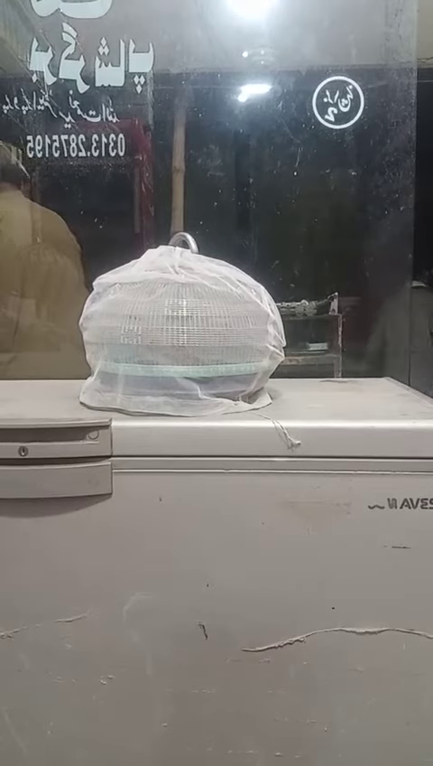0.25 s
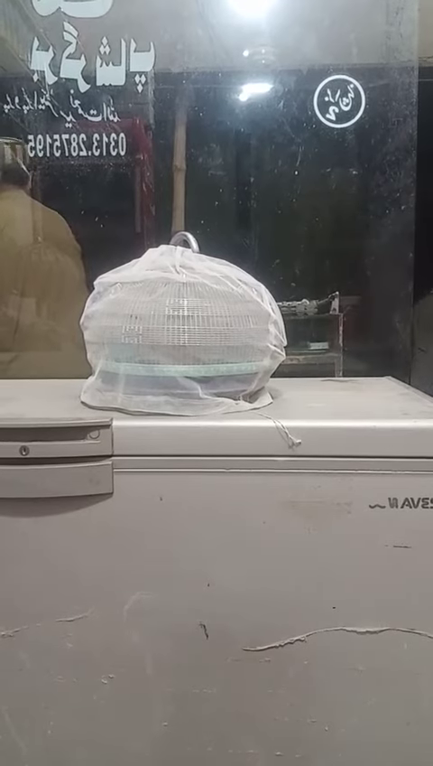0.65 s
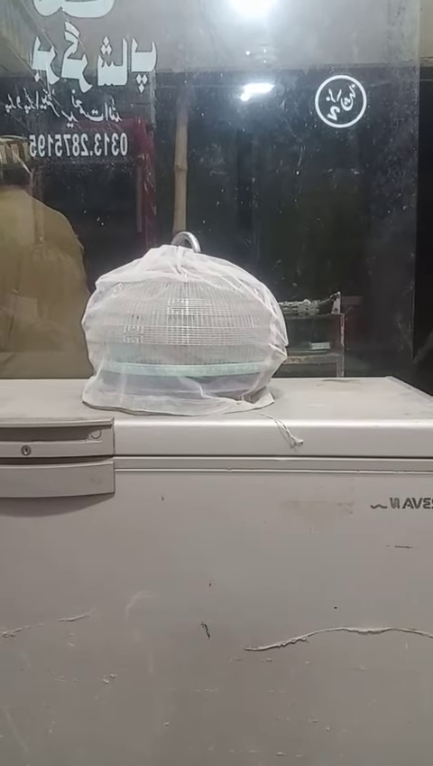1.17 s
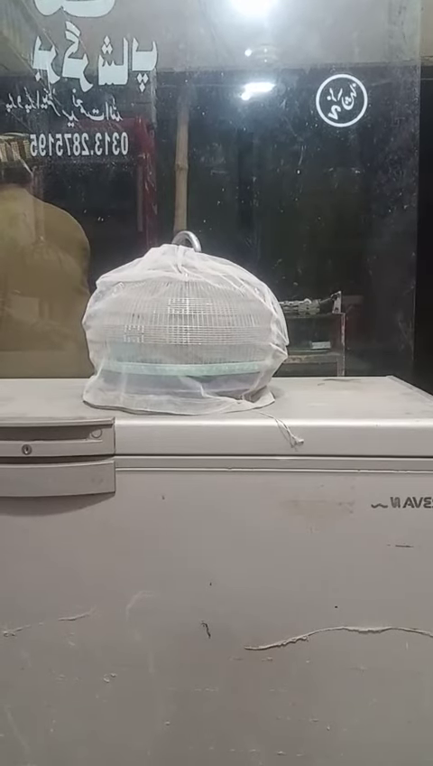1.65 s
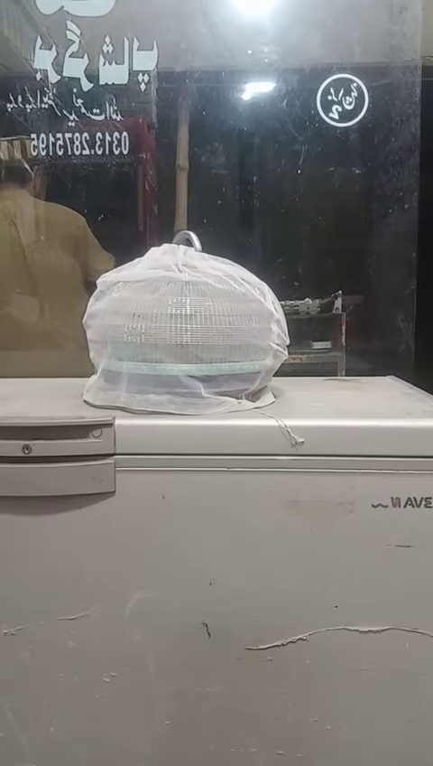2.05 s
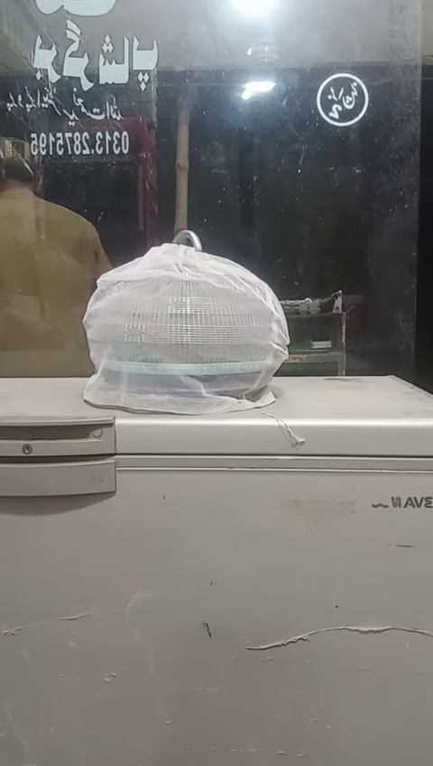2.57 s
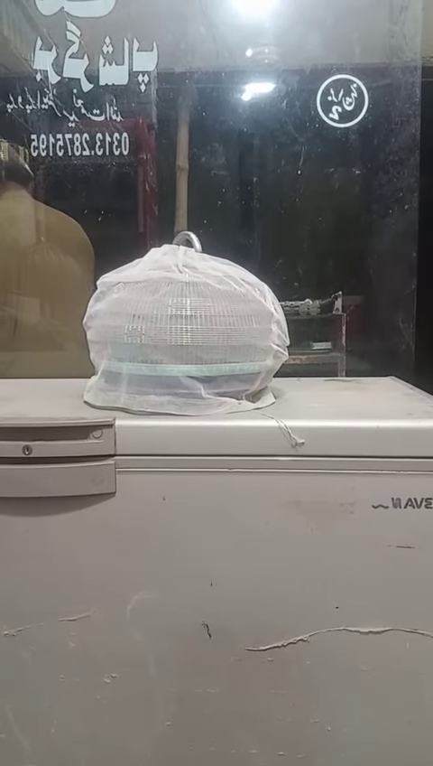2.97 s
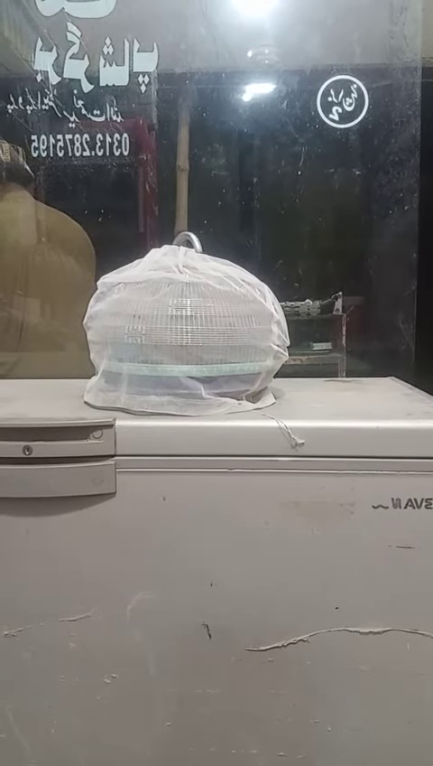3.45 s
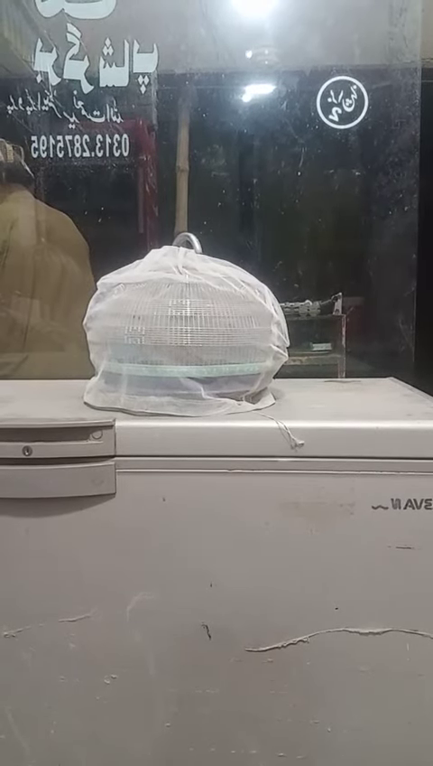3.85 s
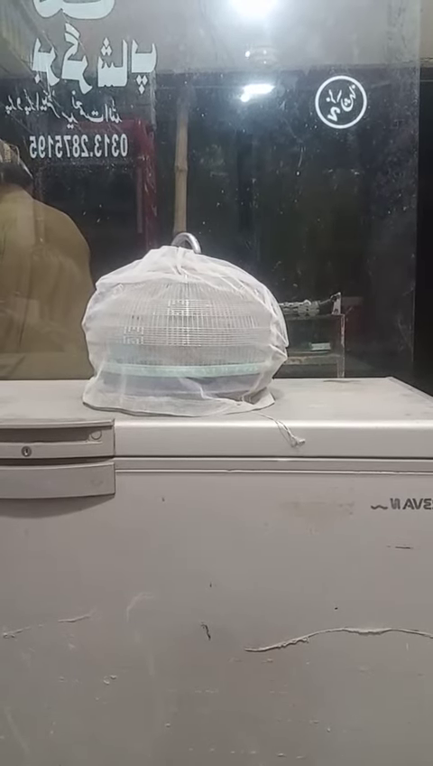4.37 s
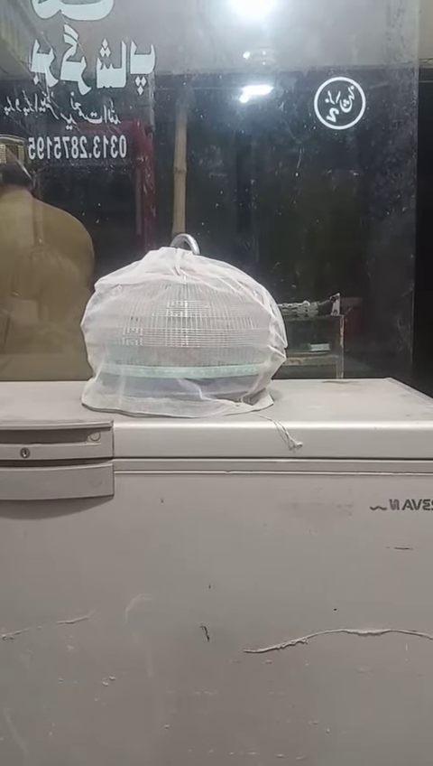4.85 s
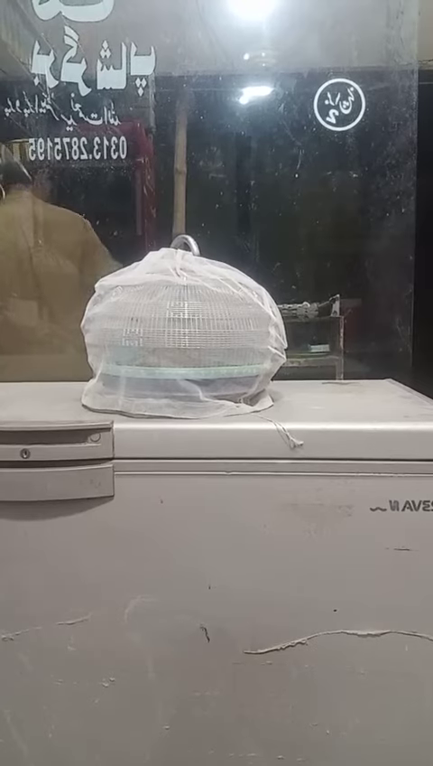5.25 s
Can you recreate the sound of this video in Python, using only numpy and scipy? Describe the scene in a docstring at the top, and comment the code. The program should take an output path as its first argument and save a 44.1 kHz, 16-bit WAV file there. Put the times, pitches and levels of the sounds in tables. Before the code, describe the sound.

A caged songbird sings a fast, varied stream of rasps, sharp pips, churring trills, buzzes, slurred whistles and harsh chirps in a small echoing shop.

```python
"""In a small shop, a lark sings in a covered cage on a chest freezer.
Its syrinx, a fluttering tone with weighted partials, gives a rasp, ticks, pips, trills, buzzes,
rattles, slurred whistles and two-voiced chirps. Cage, lid and window return quick echoes as delayed
copies; the shop rings briefly as decaying noise, over a low wash of shaped noise and a faint hum of sines."""
import sys
import numpy as np
from scipy import signal
from scipy.fft import rfft, irfft, next_fast_len
from scipy.io import wavfile
from scipy.ndimage import uniform_filter1d

SR = 44100
rng = np.random.default_rng(int(sys.argv[2]) if len(sys.argv) > 2 else 0)


def generate_wav(signal):
    """Clip the signal to [-1, 1] and save it as 16-bit WAV at the path in sys.argv[1]."""
    frames = np.transpose(np.atleast_2d(signal))
    scaled = np.clip(frames, -1, 1) * 32767
    pcm = np.round(scaled).astype(np.int16)
    wavfile.write(sys.argv[1], SR, pcm)


N = 242991
TIME = np.arange(N) / SR
# a phrase is sampled at these shares of its length
ALONG = np.linspace(0, 1, 120)
# partial blends of the churrs and of the buzzes, in the order of the partials in syrinx(),
# relative to the overtone level: level_db
CHURR_BLEND = [-9.5, 5.5, 3.5, -11, -17.5, -34]
BUZZ_BLEND = [-3, -2, 1, -22.5, -23, -34]


def gain_of(db):
    """The decibel law: 20 dB is a factor of ten in amplitude."""
    return 10 ** (np.asarray(db) / 20)


def evened(x):
    """Normalization to unit root mean square."""
    return x / np.sqrt(np.mean(x ** 2) + 1e-20)


def read(points, hz):
    """Linear interpolation of a table on a logarithmic frequency axis."""
    point_hz, value = np.transpose(points)
    return np.interp(np.log(hz + 1), np.log(point_hz + 1), value)


def coloured(x, points):
    """Zero-phase filtering: the spectrum is multiplied by a gain curve of frequency_hz, level_db."""
    size = next_fast_len(len(x) + 4096)
    gain = gain_of(read(points, np.fft.rfftfreq(size, 1 / SR)))
    return irfft(rfft(x, size) * gain, size)[:len(x)]


def drift(size, rate_hz):
    """Low-passed noise: a Gaussian spectrum leaves a smooth random motion, up to one second long."""
    hz = np.fft.rfftfreq(SR, 1 / SR)
    spectrum = rfft(rng.standard_normal(SR)) * np.exp(-(hz / rate_hz) ** 2)
    return evened(irfft(spectrum, SR))[:size]


def add(mix, start_s, sound):
    """Superposition: a sound is summed into the mix from its start, cut at the end of the mix."""
    part = mix[max(round(start_s * SR), 0):][:len(sound)]
    part += sound[:len(part)]


def background():
    """Broadband noise of street and machines, drifting in patches, and steady sines of appliances."""
    # spectrum of the wash, only its shape counts: frequency_hz, density_db_per_hz
    wash_spectrum = [(25, -29), (50, -29.5), (70, -11), (90, -10), (115, 1), (165, -3.5), (240, 3),
                     (380, 2.5), (600, -1.5), (1000, -8), (1700, -3.5), (3200, -18.5), (5800, -40),
                     (7300, -16.5), (8600, -61.5), (11000, -57)]
    # appliance hum: frequency_hz, rms_level_db
    hum_tones = [(120, -66), (409, -61), (807.5, -61)]
    wash_db, patchy_db = -41.5, 2.5
    z = signal.stft(rng.standard_normal(N), SR, nperseg=1024, noverlap=768)[2]
    patches = uniform_filter1d(rng.standard_normal(z.shape), size=20, axis=1)  # smooth in time
    patches = evened(uniform_filter1d(patches, size=6, axis=0))  # and in frequency
    patchy = z * gain_of(patchy_db * patches)
    wash = signal.istft(patchy, SR, nperseg=1024, noverlap=768)[1][:N]
    hum = sum(np.sqrt(2) * gain_of(db) * np.sin(2 * np.pi * (hz * TIME + rng.random()))
              for hz, db in hum_tones)
    return gain_of(wash_db) * evened(coloured(wash, wash_spectrum)) + hum


def phrase(time_s, hz, db, flutter, overtones_db):
    """Control curves of the syrinx: time_s, pitch_hz, level_db, flutter_share of pitch, overtones_db."""
    return np.column_stack(np.broadcast_arrays(time_s, hz, db, flutter, overtones_db))


def syrinx(rows, blend_db, flutter_hz, unevenness, rough, throb, snap=0, limp=0, waver=0, attack_s=0.003):
    """Frequency and amplitude modulation: a membrane flutter shakes the pitch and strength of a gliding tone."""
    # partials beside the sung one: multiple_of_pitch
    partials = [.5, 1.5, 2, 2.5, 3, 4]
    row_s, *columns = np.transpose(rows)
    row_s = np.maximum.accumulate(row_s)
    t = np.arange(row_s[0], row_s[-1] + 0.0023, 1 / SR)
    hz, level_db, depth, overtones_db = (np.interp(t, row_s, column) for column in columns)
    beats = np.cumsum(flutter_hz * (1 + unevenness * drift(len(t), 120))) / SR

    # a snapping flutter kicks the pitch up and lets it sink back; a limping one alternates its beats
    kick = uniform_filter1d(np.exp(-(beats % 1) / .25), size=70)
    swing = (1 - snap) * np.sin(2 * np.pi * beats)
    swing = swing + snap * evened(kick - kick.mean()) + limp * np.sin(np.pi * beats)
    # pitch and strength also wander together, more slowly
    wander = waver * drift(len(t), 60)
    shake = depth * (swing + wander + rough * drift(len(t), 820))
    phase = 2 * np.pi * np.cumsum(hz * (1 + shake + 0.004 * drift(len(t), 160))) / SR

    # the membrane swings at half the sung pitch; the throat favours its second partial
    overtones = sum(gain_of(db) * np.sin(k * phase) * (k * hz < SR / 2)
                    for k, db in zip(partials, blend_db))
    tone = np.sin(phase) + gain_of(overtones_db) * overtones
    pulse = np.cos(2 * np.pi * (beats - .15)) + 2 * limp * np.cos(np.pi * beats) + 3 * wander
    strength = evened(np.exp(throb * depth * pulse))
    edges = np.clip(np.minimum((t - t[0]) / attack_s, (t[-1] - t) / 0.0025), 0, 1)
    envelope = np.sqrt(2) * gain_of(level_db) * strength * np.sin(edges * np.pi / 2) ** 2
    return row_s[0], envelope * tone


def rasp(curve, opening_s):
    """Changing timbre: strong reedy partials give way to the sung pitch, under a slow, uneven flutter."""
    # reedy partial blend: level_db
    reedy_blend = [-7.5, 4, -3.5, -17.5, -27, -32.5]
    open_time_s, reedy_db, open_db = 0.083, 0, -25.5
    time_s, hz, db, flutter = np.transpose(curve)
    # the throat opens over both breaths
    opened = 1 - np.exp(-((time_s - opening_s) / open_time_s) ** 2)
    rows = phrase(time_s, hz, db, flutter, reedy_db + (open_db - reedy_db) * opened)
    return syrinx(rows, reedy_blend, flutter_hz=90, unevenness=.3, rough=1, throb=11, snap=.4, waver=.3)


def tick(start_s, db):
    """A rapid downward glide: an octave and a half in five milliseconds is heard as a tick."""
    times = start_s + np.array([0, .002, .005])
    rows = phrase(times, [5400, 4200, 1900], [db - 3, db, db - 14], 0, -30)
    return syrinx(rows, BUZZ_BLEND, flutter_hz=200, unevenness=0, rough=0, throb=0, attack_s=0.0015)


def tick_run(start_s, length_s, first_db, last_db):
    """A jittered pulse train: ticks at a nearly even pace, each a little stronger or weaker."""
    ticks_per_s, jitter_s, spread_db = 62, .002, 2
    t = np.arange(0, length_s, 1 / ticks_per_s)
    late, loud = rng.standard_normal((len(t), 2)).T
    db = first_db + (last_db - first_db) * t / length_s + spread_db * loud
    return [tick(*row) for row in zip(start_s + t + jitter_s * late, db)]


def pip(start_s, length_s, body_hz, end_hz, db):
    """A fast onset transient: pitch scoops up past its body, settles, then glides to its end and fades."""
    # pip partial blend: level_db
    pip_blend = [-5.5, -7.5, 5.5, -27, -17, -41]
    times = start_s + np.array([0, .003, 0.34 * length_s, length_s])
    hz = [0.96 * body_hz, 1.01 * body_hz, body_hz, end_hz]
    rows = phrase(times, hz, [db, db, db, db - 7], [0.039, 0.0017, 0.0011, 0.0019], -34)
    return syrinx(rows, pip_blend, flutter_hz=300, unevenness=.2, rough=1, throb=2, attack_s=.0011)


def trill(start_s, length_s, hz, start_db, end_db, drop, drop_s):
    """Two rates of modulation: a limping flutter makes a low churr, and a slow sway bends it."""
    catch, settle_s, soft_db = 0.19, 0.02, 7  # slides in softly from above
    lead_s, accent_db, accent_s = 0.021, 7, .03  # then lands with an accent
    sag_hz_per_s, close_db = 410, 4.5
    sway_hz, sway_share, sway_db = 7.4, 0.03475, -0.3
    t = length_s * ALONG
    unsettled, closing = np.exp(-t / settle_s), np.exp((t - length_s) / drop_s)
    sway = -np.cos(2 * np.pi * sway_hz * t)
    pitch = (hz - sag_hz_per_s * t) * (1 + catch * unsettled + sway_share * sway - drop * closing)
    entry_db = np.where(t < lead_s, -soft_db, accent_db * np.exp((lead_s - t) / accent_s))
    db = start_db + (end_db - start_db) * ALONG + entry_db + sway_db * sway - close_db * closing
    flutter = .066 * (1 - unsettled) ** 3 * (1 - .5 * closing)
    rows = phrase(start_s + t, pitch, db, flutter, overtones_db=-31.5)
    return syrinx(rows, CHURR_BLEND, flutter_hz=205, unevenness=.1, rough=.3, throb=4, limp=.5, waver=.3)


def bend(start, middle, end, turn):
    """A piecewise linear glide from start to a turning point and on to the end."""
    return np.interp(ALONG, [0, np.clip(turn, .05, .95), 1], [start, middle, end])


def buzzing(rows):
    """Roughness: a fast, fairly regular flutter is heard as a buzz."""
    return syrinx(rows, BUZZ_BLEND, flutter_hz=170, unevenness=.12, rough=.25, throb=6)


def buzz(start_s, length_s, start_hz, turn_hz, end_hz, turn, db, flutter, overtones_db):
    """A bent note under a swelling envelope, loudest where its pitch turns."""
    swell_db, fade_db = 10.5, 15
    level_db = db - swell_db * bend(0.75, 0, 0, turn) ** 2 - fade_db * bend(0, 0, 0.93, turn) ** 2
    hz = bend(start_hz, turn_hz, end_hz, turn)
    return buzzing(phrase(start_s + length_s * ALONG, hz, level_db, flutter, overtones_db))


def rattle(start_s, length_s, start_hz, turn_hz, end_hz, turn, db, flutter, overtones_db):
    """Pulsed modulation: a slower, snapping flutter breaks a bent note that rises, holds and lets go."""
    attack_s, release_s, edge_db = 0.014, 0.016, 12.5
    t = length_s * ALONG
    held = np.clip(np.minimum(t / attack_s, (length_s - t) / release_s), 0, 1)
    hz = bend(start_hz, turn_hz, end_hz, turn)
    rows = phrase(start_s + t, hz, db - edge_db * (1 - held), flutter, overtones_db)
    return syrinx(rows, BUZZ_BLEND, flutter_hz=125, unevenness=.1, rough=.12, throb=6, snap=.4)


def whistle(curve):
    """A nearly sinusoidal tone: weak partials and a shallow flutter leave a pure pitch that slurs."""
    # whistle partial blend: level_db
    pure_blend = [3.5, -0.5, 3.5, -30, -13.5, -38]
    rows = phrase(*np.transpose(curve), flutter=.004, overtones_db=-39.5)
    return syrinx(rows, pure_blend, flutter_hz=239, unevenness=0.68, rough=0.99, throb=1.7)


def loop():
    """Pitch-dependent roughness: a buzz climbs, grows harsh at the top and comes down again."""
    # the looping buzz: time_s, pitch_hz, level_db
    curve = [(4.41, 3643, -34.5), (4.44, 3702, -15), (4.463, 3680, -25), (4.502, 4115, -22),
             (4.53, 5090, -23.5), (4.567, 5227, -21), (4.597, 4170, -30), (4.626, 3994, -25.5),
             (4.67, 4095, -19.5), (4.685, 3630, -39)]
    time_s, hz, db = np.transpose(curve)
    # the flutter deepens as a power of the pitch
    return buzzing(phrase(time_s, hz, db, 0.033 * (hz / hz[0]) ** 2.8, overtones_db=-33.5))


def chirp(start_s, length_s, rise_s, low_hz, low_db, high_hz, high_db):
    """Two sources in one syrinx: one sweeps up cleanly, then both flutter harshly as they sink."""
    foot_hz, overshoot, low_sink, high_sink = 1566, .07, .26, 0.0688  # all but the foot: shares of pitch
    sweep_db, low_fade_db, high_fade_db = 4, 12, 11.5
    low_flutter, high_flutter, overtones_db = 0.11, 0.088, -31
    t = length_s * ALONG
    risen = np.minimum(t / rise_s, 1)
    after = np.maximum((t - rise_s) / (length_s - rise_s), 0)
    top_hz = low_hz * (1 + overshoot)
    hz = (foot_hz + (top_hz - foot_hz) * risen ** 1.198) * (1 - low_sink * after ** 1.8)
    db = low_db + sweep_db * np.sin(np.pi * risen) - low_fade_db * after
    lower = phrase(start_s + t, hz, db, low_flutter * (t > rise_s), overtones_db)

    upper_s = start_s + rise_s + (length_s - rise_s) * ALONG
    upper = phrase(upper_s, high_hz * (1 - high_sink * ALONG), high_db - high_fade_db * ALONG,
                   high_flutter, overtones_db)
    return [syrinx(rows, CHURR_BLEND, flutter_hz=332, unevenness=0.18, rough=0.76, throb=2.5)
            for rows in (lower, upper)]


def song():
    """Superposition of all syllables, each kind with its own flutter."""
    # two breaths of rasp, each a curve: time_s, pitch_hz, level_db, flutter_share of pitch
    breaths = [
        [(.08, 3700, -50, .005), (.11, 3537, -30.5, 0.016), (.18, 3784, -25.5, .038), (.23, 3674, -20.5, 0.034),
         (.285, 3454, -20, 0.031), (.31, 3497, -21, 0.016), (.35, 3450, -18.5, 0.0052),
         (.368, 3470, -37.5, .012)],
        [(.372, 3470, -27, 0.027), (.383, 3388, -15, 0.035), (.43, 3333, -21.5, 0.026),
         (.485, 3120, -22.5, 0.033), (.505, 3160, -48, 0.016)],
    ]
    # runs of ticks: start_s, length_s, first_level_db, last_level_db
    tick_runs = [(.111, .19, -30, -24), (.384, .1, -27, -27.5)]
    # pips: start_s, length_s, body_pitch_hz, end_pitch_hz, level_db
    pips = [(0.548, 0.017, 5055, 4980, -15.5), (0.572, 0.013, 4994, 5210, -11.5),
            (0.6, 0.024, 4860, 5080, -15.5), (0.645, 0.023, 4870, 5120, -13),
            (0.666, 0.038, 4880, 5300, -14.5), (0.736, 0.022, 5070, 5370, -13.5),
            (0.75, .032, 5300, 5300, -12), (0.78, 0.045, 5213, 5040, -15.5), (.892, 0.01, 5063, 5000, -14),
            (0.91, 0.016, 5042, 5250, -9.5), (0.942, 0.033, 5002, 5300, -12),
            (0.991, 0.019, 4954, 5080, -12.5), (1.018, .04, 4917, 5270, -11),
            (1.073, 0.016, 5250, 5060, -17), (1.092, 0.012, 5060, 5040, -11), (1.11, .028, 4964, 4890, -14),
            (1.139, 0.028, 5140, 4960, -15.5)]
    # trills: start_s, length_s, pitch_hz, start_level_db, end_level_db, closing_drop_share, drop_time_s
    trills = [(1.299, 0.56, 2772, -28, -23.5, .11, .04), (2.627, .396, 2850, -24.5, -24.5, .38, 0.011)]
    # buzzes and rattles: start_s, length_s, start_hz, turn_hz, end_hz, turn_place (0-1), level_db,
    # flutter_share of pitch, overtones_db
    buzzes = [(1.987, 0.035, 1960, 1985, 2280, 0.5, -34.5, 0.048, -8),
              (2.026, .131, 4860, 5483, 5330, 0.2, -22, .075, -34),
              (2.123, .038, 2896, 2743, 2890, 0.66, -42.5, 0.032, -30),
              (2.22, .045, 2123, 2346, 2630, 0.69, -39, 0.055, -0.5),
              (2.263, .017, 4900, 4960, 4160, .35, -21.5, .05, -31.5),
              (2.334, .018, 5760, 4435, 4240, .2, -17, 0.016, -31.5),
              (2.345, .12, 3076, 3710, 4440, 0.25, -31.5, .06, -28.5),
              (2.484, 0.041, 5560, 4908, 4470, 0.7, -17.5, 0.02, -40),
              (4.108, 0.054, 4810, 5060, 4650, .55, -19.5, 0.066, -38),
              (4.219, 0.073, 4435, 3465, 3010, 0.51, -20, .055, -26),
              (4.328, 0.069, 4050, 3760, 3640, .48, -27, .017, -13.5),
              (5.402, 0.041, 1868, 3020, 3890, .36, -26.5, 0.024, -30),
              (5.423, 0.063, 4300, 4450, 4550, 0.4, -34.5, 0.016, -34),
              (5.475, .048, 2757, 3570, 3680, 0.45, -23, .04, -28),
              (5.481, 0.03, 3980, 4506, 4500, 0.7, -27, 0.02, -29)]
    rattles = [(2.342, .15, 4384, 4444, 5644, .28, -18.5, .075, -29.5),
               (4.327, .075, 4660, 4640, 4820, .45, -19, 0.12, -26.5)]
    # slurred whistles, each a curve: time_s, pitch_hz, level_db
    whistles = [
        [(3.168, 5206, -27), (3.184, 4760, -18), (3.21, 4430, -20.5), (3.24, 3895, -20.5), (3.275, 3770, -31),
         (3.3, 4268, -17.5), (3.345, 4310, -25), (3.36, 4470, -27)],
        [(3.394, 5285, -23.5), (3.413, 4844, -14), (3.445, 4560, -19), (3.5, 4450, -27.5), (3.555, 4706, -22),
         (3.59, 4050, -26), (3.62, 4050, -13), (3.652, 3817, -40)],
        [(3.745, 3980, -26), (3.755, 4195, -17.5), (3.8, 4410, -26.5), (3.842, 4920, -16.5), (3.87, 4950, -26)],
        [(3.871, 5360, -25), (3.88, 5460, -11.5), (3.915, 5150, -29.5), (3.945, 4336, -22),
         (3.968, 4160, -12.5), (3.998, 3940, -37), (4.025, 4117, -20.5), (4.055, 4143, -29), (4.095, 4557, -15),
         (4.125, 4860, -26.5)],
    ]
    # chirps: start_s, length_s, rise_s, lower_hz, lower_db, upper_hz, upper_db
    chirps = [(4.744, .08, 0.012, 2495, -25.5, 2876, -24), (4.888, 0.088, .016, 2280, -26, 2960, -26),
              (4.982, 0.092, 0.017, 2453, -24.5, 2808, -28.5),
              (5.091, 0.09, .016, 2292, -23.5, 2910, -23.5), (5.191, .075, 0.016, 2317, -22.5, 2982, -22)]

    opening_s = breaths[0][0][0]
    notes = [rasp(curve, opening_s) for curve in breaths]
    notes += [one for row in tick_runs for one in tick_run(*row)]
    for sing, table in (pip, pips), (trill, trills), (buzz, buzzes), (rattle, rattles):
        notes += [sing(*row) for row in table]
    notes += [whistle(curve) for curve in whistles] + [loop()]
    notes += [voice for row in chirps for voice in chirp(*row)]
    out = np.zeros(N)
    for start_s, sound in notes:
        add(out, start_s, sound)
    return out


def shop(x):
    """Convolution with a room response: direct sound, discrete reflections, then a diffuse tail."""
    # reflections from cage, lid and window: delay_ms, gain (re direct sound)
    echoes = [(0.776, 0.09), (1.438, 0.27), (2.236, 0.042), (3.98, 0.38), (5.773, 0.4), (6.279, 0.026),
              (7.639, 0.49), (10.172, 0.057), (15.798, 0.31), (18.825, 0.2)]
    # reverberation time of the shop: frequency_hz, t60_s
    ring = [(1500, 0.14), (3000, 0.45), (5000, 0.35), (9000, 0.051), (15000, 0.29)]
    tail_db, build_s = -4, 0.0042  # tail energy re direct sound; time in which it builds up
    size = SR // 2
    hz, t, z = signal.stft(rng.standard_normal(size), SR, nperseg=256)
    decay = gain_of(-60 * t / read(ring, hz)[:, None])
    tail = signal.istft(z * decay, SR, nperseg=256)[1][:size]
    tail *= 1 - np.exp(-(np.arange(size) / SR / build_s) ** 2)

    # a delay is a phase slope, so echoes may fall between samples
    hz = np.fft.rfftfreq(size, 1 / SR)
    reflections = sum(gain * np.exp(-2j * np.pi * hz * ms / 1000) for ms, gain in echoes)
    early = irfft(1 + reflections, size)
    response = early + gain_of(tail_db) * tail / np.linalg.norm(tail)
    return signal.fftconvolve(x, response / np.linalg.norm(response))[:N]


def scene():
    """Superposition of the bird in the shop, coloured on its path, and the background."""
    # colour of cloth and microphone: frequency_hz, level_db
    colour = [(1000, -13.5), (2300, 3.5), (2750, 4), (3200, 0.5), (4200, -2.5), (5000, 1.5), (5700, -1.5),
              (6300, -2), (7300, 6), (10000, -6.5), (11500, -32), (13500, 15), (15500, 0)]
    return (coloured(shop(song()), colour) + background())[None]


def record(dry):
    """Dynamic range compression: gain drops on loud notes and recovers slowly; then a low-pass filter."""
    threshold_db, squeeze, recovery_db_per_s = -15, 0.36, 10  # squeeze: dB of cut per dB over
    edge_hz = 15800
    power_db = 10 * np.log10(abs(uniform_filter1d(dry[0] ** 2, size=200)) + 1e-12)
    # a running peak that falls at the recovery rate
    fall_db = TIME * recovery_db_per_s
    peak_db = np.maximum.accumulate(power_db + fall_db) - fall_db
    over_db = np.maximum(peak_db - threshold_db, 0)
    ducked = dry / gain_of(squeeze * uniform_filter1d(over_db, size=150))
    low_pass = signal.firwin(511, edge_hz, window=("kaiser", 9), fs=SR)
    return signal.oaconvolve(ducked, low_pass[None], "same")


dry = scene()
out = record(dry)
generate_wav(out)
```